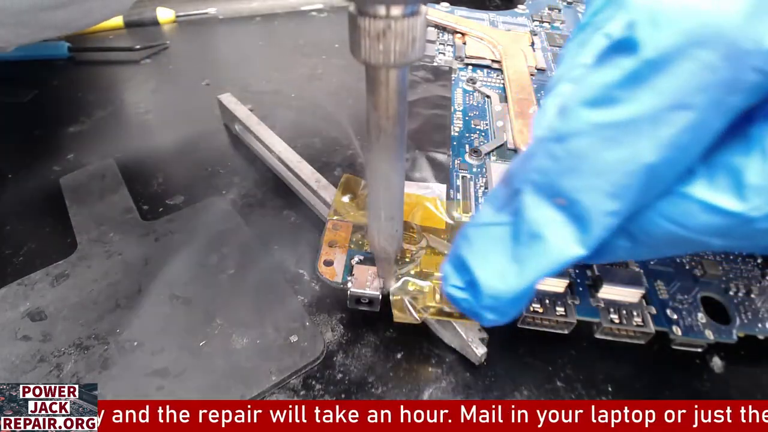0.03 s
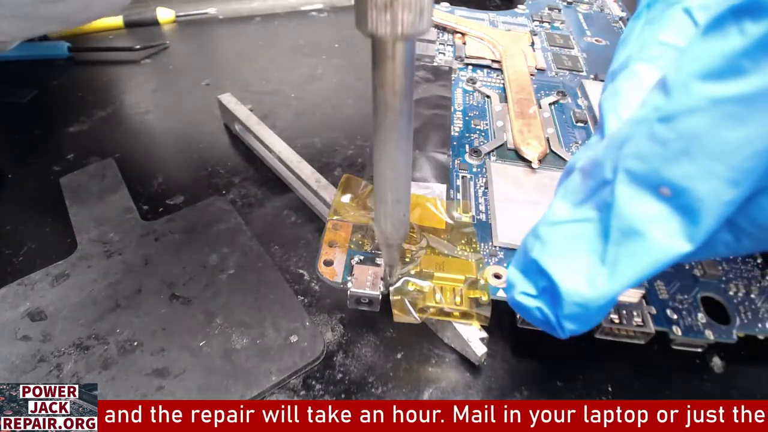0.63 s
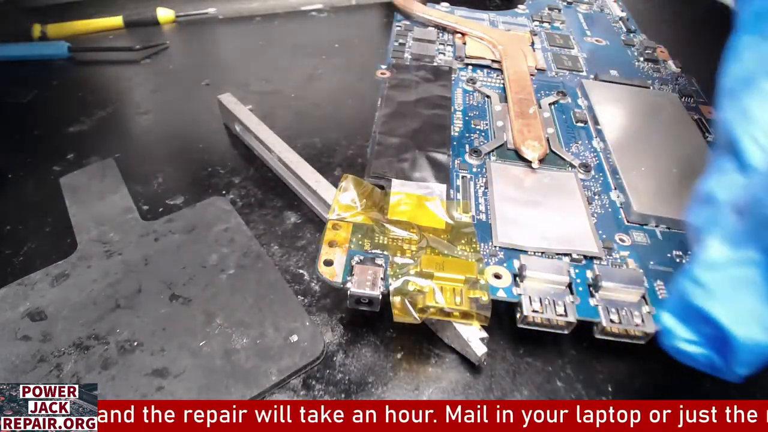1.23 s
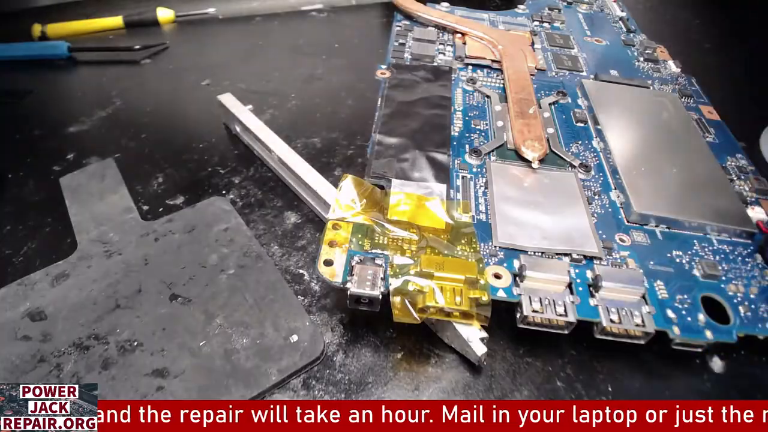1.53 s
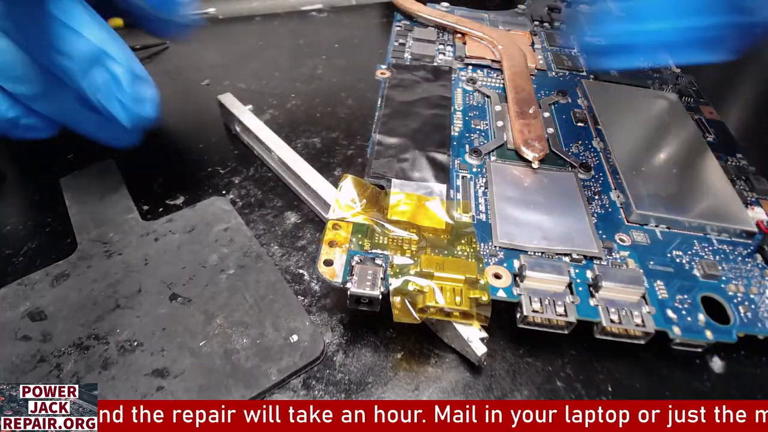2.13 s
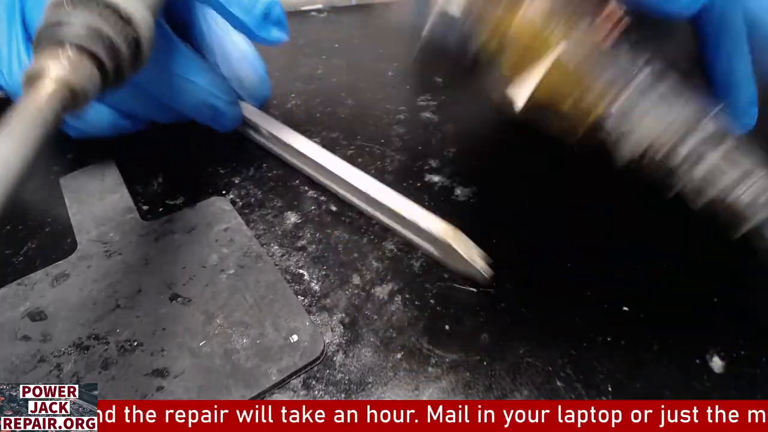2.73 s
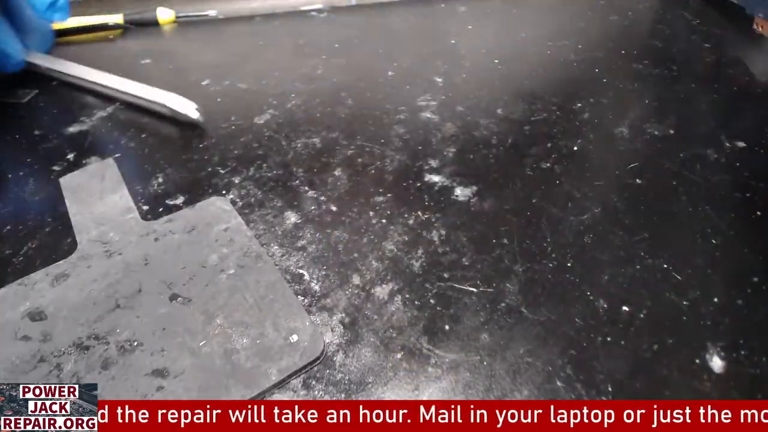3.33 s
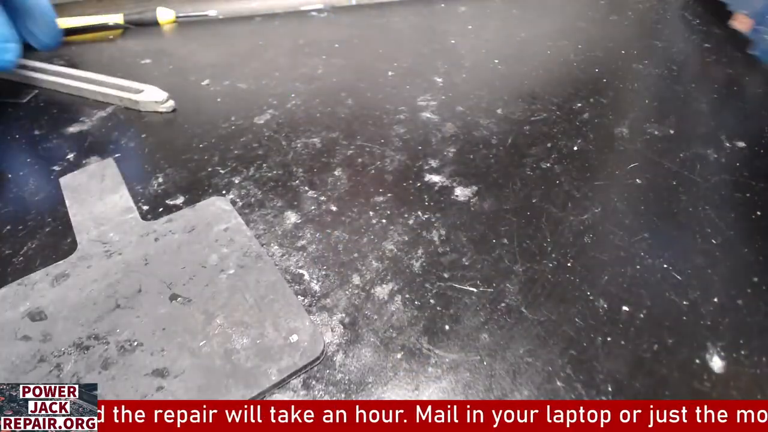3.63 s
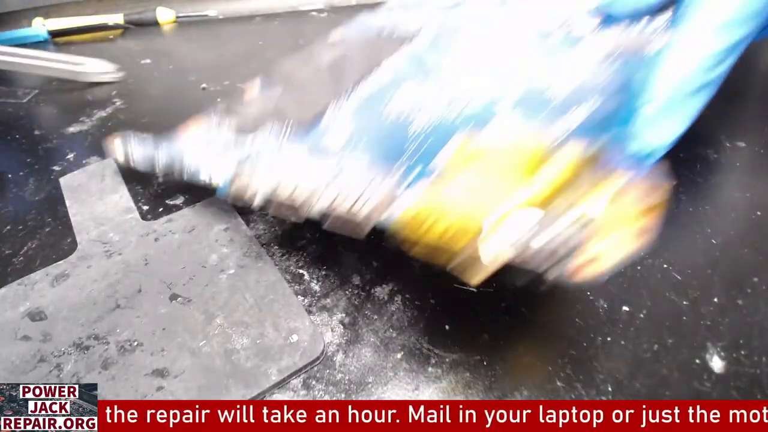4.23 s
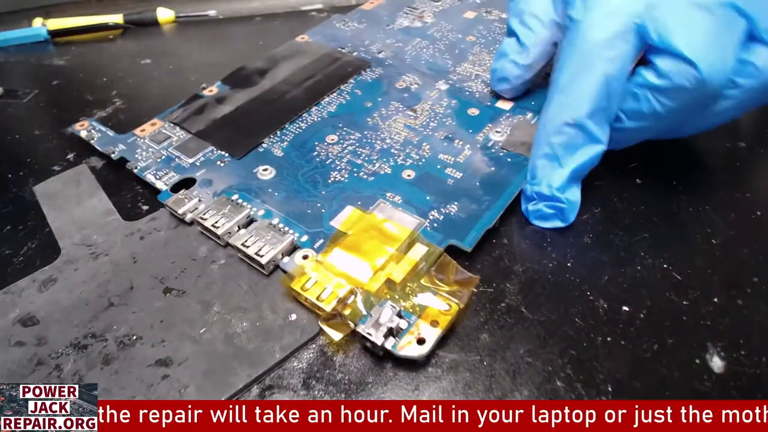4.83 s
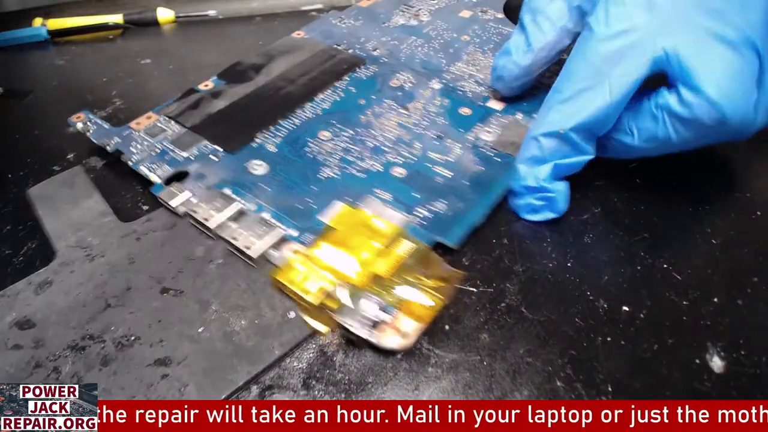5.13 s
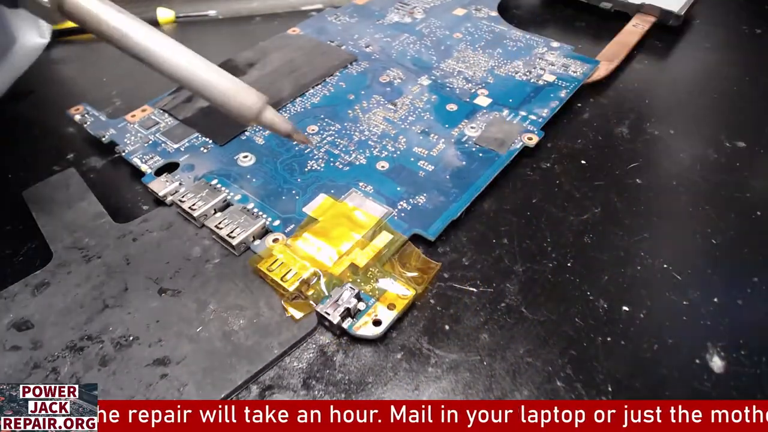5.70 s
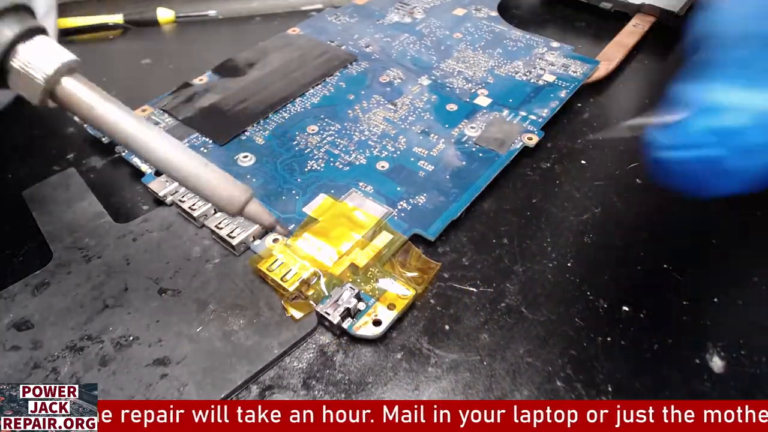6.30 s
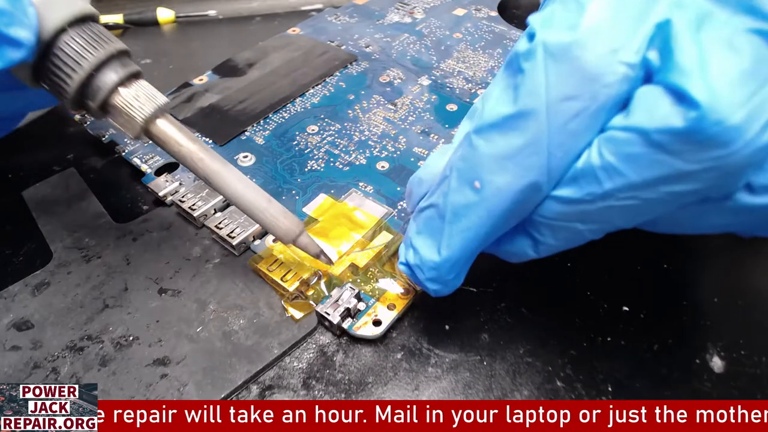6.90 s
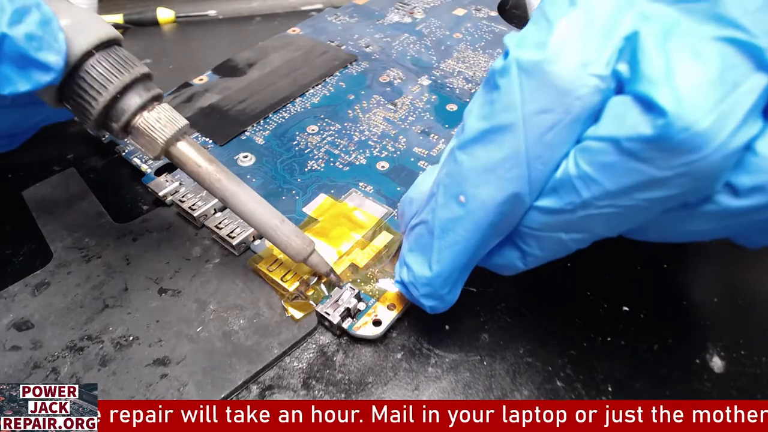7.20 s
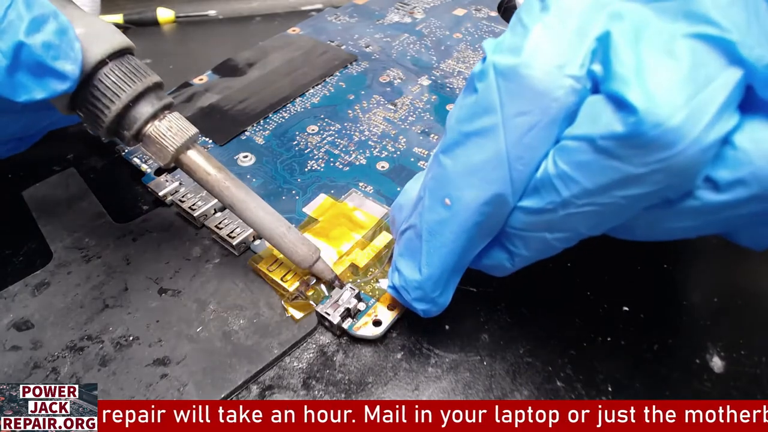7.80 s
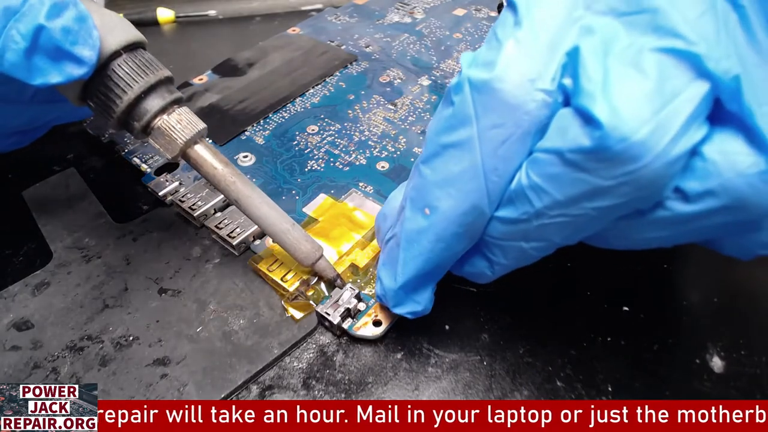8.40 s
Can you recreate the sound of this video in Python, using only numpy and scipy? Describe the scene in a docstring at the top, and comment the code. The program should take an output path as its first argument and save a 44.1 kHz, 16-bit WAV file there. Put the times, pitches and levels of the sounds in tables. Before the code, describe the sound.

A small fan hums and whines steadily while a circuit board knocks lightly and a steel tool drops with a ringing rattle.

```python
"""A small fan runs on a repair bench throughout: its blade tone throbs against mains hum, under a
wavering whine and rushing air. Gloved hands lift a circuit board with small knocks, and slide a
steel tool out from under it, tapping the bench (from 2.5 s). The tool drops and bounces with a
short ringing rattle (3.4 s). Then the board is laid down again (4.2 s) and the fan runs on."""
import sys
import numpy as np
from scipy import signal
from scipy.fft import rfft, irfft
from scipy.io import wavfile

SR = 44100
rng = np.random.default_rng(int(sys.argv[2]) if len(sys.argv) > 2 else 0)


def master_out(mix):
    """Clip the mix to full scale and print it as 16-bit PCM to the path in sys.argv[1]."""
    frames = np.transpose(np.atleast_2d(mix))
    ceiling = np.clip(frames, -1, 1)
    pcm = np.round(ceiling * 32767).astype(np.int16)
    wavfile.write(sys.argv[1], SR, pcm)


N = 377055
TIME = np.arange(N) / SR


def dropped_tool(ring_db=-46.5, fade_db_per_s=110, tilt_db=5.5, dull_db_per_s=170, rise_s=0.0068):
    """The steel tool bounces: each hit clacks and makes it ring, later hits more weakly and dully."""
    # the landing and bounces: start_s, clack_db
    bounces = [(3.4245, -34.5), (3.429, -37), (3.461, -38.5), (3.468, -41), (3.483, -41.5), (3.498, -41.5),
               (3.512, -53)]
    # the notes the steel rings at: pitch_hz, relative_db, decay_s (time to fade by 60 dB)
    steel_notes = [(5604, -14, .22), (6078, -9, .22), (6372, -3, .3), (6516, -4, .28), (6890, 0, .26),
                   (7176, -3, .26), (10150, -26, .26), (10590, -22, .2), (11730, -11, .19),
                   (12310, -21, .22), (13120, -24, .2), (13240, -21, .22), (15200, -36, .22)]
    out, t = np.zeros(N), np.arange(SR) / SR
    landing_s, strongest_hz = bounces[0][0], steel_notes[4][0]
    for start_s, clack_db in bounces:
        add(out, start_s, amp(clack_db) * clack(t, 1.1, decay_s=0.047, room_db=-12, room_decay_s=0.53))
    for hz, db, decay_s in steel_notes:
        energy = np.zeros(len(t))
        for start_s, _ in bounces:
            late_s = start_s - landing_s
            age = np.maximum(t - late_s, 0)
            bright_db = (tilt_db - dull_db_per_s * late_s) * np.log2(hz / strongest_hz)
            level_db = db + ring_db - fade_db_per_s * late_s + bright_db
            energy += (amp(level_db - 60 * age / decay_s) * (1 - np.exp(-age / rise_s))) ** 2
        flutter = 1 + 0.49 * drift(70)[:len(t)]
        add(out, landing_s, np.sqrt(2 * energy) * np.sin(2 * np.pi * hz * t) * flutter)
    return out


def tool_taps():
    """The held tool taps the bench and pings; the grip sets the pitch and cuts the ring short."""
    # taps as it is drawn out: start_s, level_db, brightness_db_per_octave, pitch_hz
    taps = [(2.488, -42, -1, 6120), (2.848, -43.5, 8.5, 6560), (3.258, -43, 1, 6100)]
    # notes of the held steel: pitch_multiple, relative_db, decay_s
    held_notes = [(1, -4, .11), (1.17, -24, .12), (1.42, -35, .11)]
    out, t = np.zeros(N), np.arange(SR // 2) / SR
    for start_s, db, tilt_db, pitch_hz in taps:
        ping = sum(amp(note_db) * ring(t, multiple * pitch_hz, decay_s, scatter=0.83, scatter_hz=300)
                   for multiple, note_db, decay_s in held_notes)
        add(out, start_s, amp(db) * (clack(t, tilt_db) + ping))
    return out


def board_knocks():
    """The circuit board clacks on the bench and rings briefly."""
    # the knocks: start_s, level_db, brightness_db_per_octave
    knocks = [(.883, -56, 4), (1.771, -55, 1), (1.860, -60, 7), (2.489, -36, -2.5), (2.524, -49, 3),
              (3.009, -54, 7), (3.891, -55, 1), (3.911, -55, 4), (4.241, -42, -2.5), (4.508, -50, -6),
              (4.690, -52, -4)]
    # notes of the board: pitch_hz, relative_db, decay_s
    board_notes = [(1655, -5, 0.062), (2164, -13.5, .08), (2770, -13, 0.088)]
    out, t = np.zeros(N), np.arange(SR // 2) / SR
    for start_s, db, tilt_db in knocks:
        ringing = sum(amp(note_db) * ring(t, hz, decay_s) for hz, note_db, decay_s in board_notes)
        add(out, start_s, amp(db) * (clack(t, tilt_db) + ringing))
    return out


def clack(t, tilt_db, decay_s=0.037, room_db=-15, room_decay_s=0.63):
    """A hard hit shakes the bench at once, dies quickly and leaves a faint echo in the room."""
    attack = 1 - np.exp(-(t / .0002) ** 2)
    fade = np.hypot(amp(-60 * t / decay_s), amp(room_db - 60 * t / room_decay_s))
    return bench_noise(len(t), tilt_db) * attack * fade


def bench_noise(size, tilt_db):
    """The bench top shakes with a short noise; tilt_db makes it brighter or duller per octave."""
    # tone colour of the bench top: pitch_hz, relative_db
    colour = [(150, -8), (600, -7), (1200, 0), (1700, 1), (2800, -3), (5000, -6), (7000, -8), (8500, -21),
              (11000, -35), (15500, -42)]
    hz = np.fft.rfftfreq(size, 1 / SR)
    db = level_at(colour, hz) + tilt_db * np.log2(np.clip(hz, 1200, 10000))
    return unit(irfft(rfft(rng.standard_normal(size)) * amp(db), size))


def ring(t, hz, decay_s, scatter=0.52, scatter_hz=260):
    """One dying note, roughened by echoes off the bench."""
    roughness = 1 + scatter * (drift(scatter_hz) + 1j * drift(scatter_hz))[:len(t)]
    note = (roughness * np.exp(2j * np.pi * (hz * t + rng.random()))).real
    attack = 1 - np.exp(-t * 1000)
    return unit(note) * attack * amp(-60 * t / decay_s)


def handling(grain_db=3.0):
    """Soft low bumps, and the grainy rubbing of gloves and sliding parts."""
    # bumps of the bench: start_s, pitch_hz, level_db, length_s
    bumps = [(2.98, 157, -48.5, 0.15), (3.426, 190, -45, 0.083), (3.428, 102, -49, 0.11),
             (3.447, 278, -49, 0.071), (5.246, 43.6, -52, .16)]
    # rustles and slides: start_s, length_s, level_db, brightness_db_per_octave
    rubs = [(1.65, 0.25, -72, 13), (2.82, 0.34, -61, -4), (2.84, 0.062, -71, 15), (2.88, 0.2, -71, 8),
            (3.834, 0.11, -71, 8), (4.195, 0.12, -74, 10)]
    out = np.zeros(N)
    for start_s, hz, db, length_s in bumps:
        t = np.arange(round(length_s * SR)) / SR
        add(out, start_s, amp(db) * unit(np.hanning(len(t)) * np.sin(2 * np.pi * hz * t)))
    for start_s, length_s, db, tilt_db in rubs:
        size = round(length_s * SR)
        grain = amp(grain_db * drift(120)[:size])
        rub = bench_noise(size, tilt_db) * grain * np.sqrt(np.hanning(size))
        add(out, start_s, amp(db) * unit(rub))
    return out


def fan_hum(mains_hz, blade_hz=129.6, blade_db=-45.5, shimmer=0.18):
    """The blade tone and the hum at twice the mains pitch slip in and out of step, so they throb."""
    # hum of the motor iron: mains_multiple, level_db
    hum_notes = [(1, -49), (2, -45.5), (3, -56.5), (4, -66.5), (5, -56), (6, -63), (7, -68), (9, -78),
                 (10, -61), (12, -95), (13, -74.5), (14, -66.5), (15, -65), (17, -84), (19, -79), (20, -78),
                 (25, -74)]
    # weaker steady tones of running machines: pitch_hz, level_db
    steady_tones = [(50.4, -62), (100.2, -76), (150.1, -60), (170.1, -60.5), (210, -64.5), (270, -63.5),
                    (330.3, -84)]
    angle = 2 * np.pi * (TIME - .072)  # blades and hum push together at 0.072 s
    wobble = 0.066 * drift(0.91)  # the blades run slightly ahead and behind
    out = amp(blade_db) * np.sqrt(2) * np.cos(blade_hz * angle + wobble)
    for multiple, db in hum_notes:
        if multiple <= 2:
            out += amp(db) * np.sqrt(2) * np.cos(multiple * mains_hz * angle)
        else:
            out += amp(db) * tone(multiple * mains_hz) * (1 + shimmer * drift(1.3))
    return out + sum(amp(db) * tone(hz) for hz, db in steady_tones)


def motor_whine(mains_hz, pitch_hz=1105, wander_hz=6.15, flutter=0.47, echo=0.35, echo_s=.045):
    """The whine wavers with the motor's speed and mixes with its echo in the room."""
    # the whine and the side tones the mains adds: offset_in_mains_multiples, level_db
    whine_tones = [(-10, -70.5), (-4, -62.5), (0, -58.5), (1, -68), (6, -72.5)]
    hz = pitch_hz + wander_hz * drift(7)
    out = np.zeros(N)
    for offset, db in whine_tones:
        lift_db = swell_db() if abs(offset) <= 1 else 0
        out += amp(db + lift_db) * tone(hz + offset * mains_hz) * (1 + flutter * drift(43))
    return (out + echo * np.roll(out, round(echo_s * SR))) / np.sqrt(1 + echo ** 2)


def housing_whistles():
    """Swirling air blows fuzzy whistles in the fan housing."""
    # the whistles: pitch_hz, width_hz, level_db, share_of_swell (0 to 1)
    whistles = [(1140, 2.4, -65, 0.7), (1143, 26, -71.5, 0.6), (1181, 42, -64, 0), (1466, 118, -65.5, 0.05),
                (1569, 33, -70, 0), (2194, 76, -68, .3), (2260, 16, -71.5, 1), (3780, 30, -91.5, 0),
                (4440, 44, -85, 0)]
    hz, out = np.fft.rfftfreq(N, 1 / SR), np.zeros(N)
    swirl = rfft(rng.standard_normal(N))
    for pitch_hz, width_hz, db, share in whistles:
        whistle = irfft(swirl / (1 + 1j * (hz - pitch_hz) / width_hz) ** 2, N)
        out += amp(db + share * swell_db()) * unit(whistle)
    return out


def swell_db(rise_s=0.44, fall_s=0.82):
    """The whine and whistles grow louder, hold and fall back."""
    # the swells: start_s, time_until_fall_s, lift_db
    swells = [(1.556, 2.93, 3.5), (5.6, 1.1, 2)]
    out = np.zeros(N)
    for start_s, length_s, lift_db in swells:
        age = TIME - start_s
        out += lift_db * np.clip(np.minimum(age / rise_s, 1 - (age - length_s) / fall_s), 0, 1)
    return out


def rushing_air(level_db=-48.5, waver_db=0.55):
    """Rushing air makes the bench and room boom, and echoes off nearby things."""
    # tone colour of the air: pitch_hz, relative_db
    colour = [(22, -5.5), (40, -15), (75, -4.5), (235, -5.5), (290, -0.5), (390, -0.8), (520, -10),
              (860, -8.5), (1010, -12), (1650, -18.5), (2000, -21.5), (2800, -28), (5300, -24.5),
              (6700, -26), (8800, -43.5), (15500, -47.5)]
    # low notes of bench and room: pitch_hz, width_hz, lift_db
    booms = [(43, 7, 4), (84.4, 6.4, 11.5), (103, 10.7, 9.5), (367, 57, 3.5)]
    # echoes off the bench and its gear: delay_s, gain
    echoes = [(.00146, -0.039), (.00157, 0.11), (.00489, -.08)]
    hz = np.fft.rfftfreq(N, 1 / SR)
    boom_db = sum(lift / (1 + (2 * (hz - pitch) / width) ** 2) for pitch, width, lift in booms)
    echo = sum(gain * np.exp(-2j * np.pi * hz * delay_s) for delay_s, gain in echoes)
    echo /= 1 + (hz / 8000) ** 8  # the echoes lack high treble
    shape = amp(level_at(colour, hz) + boom_db) * (1 + echo)
    loudness = amp(level_db + waver_db * drift(9.3))
    return loudness * unit(irfft(rfft(rng.standard_normal(N)) * shape, N))


def amp(db):
    """Turns decibels into a gain."""
    return 10 ** (np.asarray(db) / 20)


def unit(x):
    """Scales a sound to an average (rms) level of 1."""
    return x / np.sqrt(np.mean(x ** 2) + 1e-20)


def add(mix, start_s, sound):
    """Mixes a sound in at start_s."""
    part = mix[max(round(start_s * SR), 0):][:len(sound)]
    part += sound[:len(part)]


def level_at(colour, hz):
    """Looks up a tone colour's level in dB at each pitch."""
    pitches, db = np.transpose(colour)
    return np.interp(np.log(hz + 1), np.log(pitches), db)


def drift(rate_hz):
    """Smooth random wandering with a typical size of 1."""
    hz = np.fft.rfftfreq(N // 64, 64 / SR)
    slow = irfft(rfft(rng.standard_normal(N // 64)) * np.exp(-(hz / rate_hz) ** 2) * (hz > 0))
    return unit(np.interp(TIME, np.linspace(0, TIME[-1], len(slow)), slow))


def tone(hz):
    """A pure tone at a steady or changing pitch."""
    return np.sqrt(2) * np.sin(2 * np.pi * (np.cumsum(hz * np.ones(N)) / SR + rng.random()))


def scene(mains_hz=60.03):
    """The running fan and the work on the bench, in one channel."""
    fan = fan_hum(mains_hz) + motor_whine(mains_hz) + housing_whistles() + rushing_air()
    return (fan + board_knocks() + tool_taps() + dropped_tool() + handling())[None]


def record(dry, cutoff_hz=15750):
    """Cuts off the highest treble."""
    low_pass = signal.firwin(1023, cutoff_hz, window=("kaiser", 9), fs=SR)
    return signal.oaconvolve(dry, low_pass[None], "same")


dry = scene()
out = record(dry)
master_out(out)
```